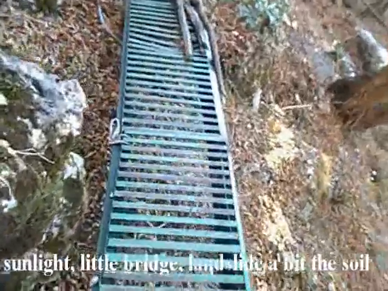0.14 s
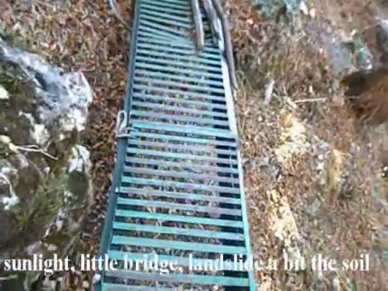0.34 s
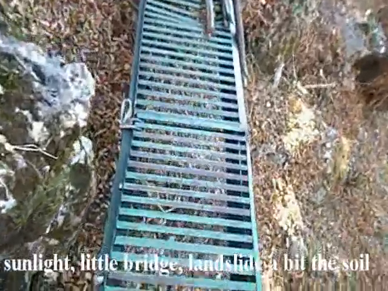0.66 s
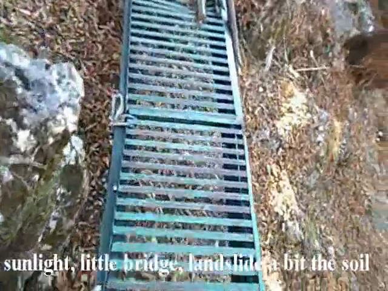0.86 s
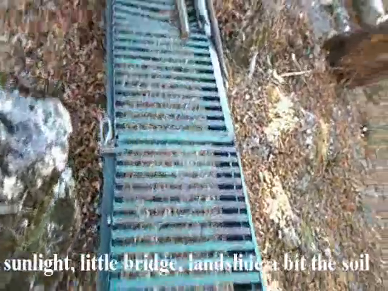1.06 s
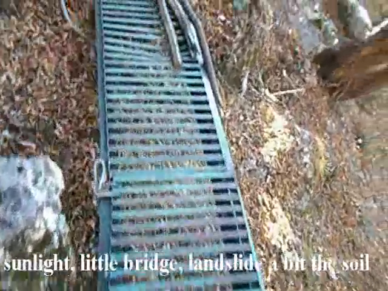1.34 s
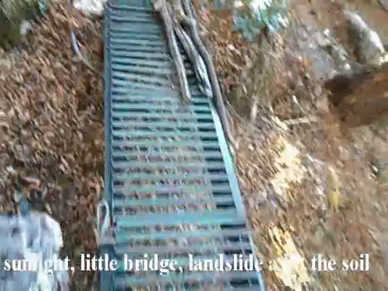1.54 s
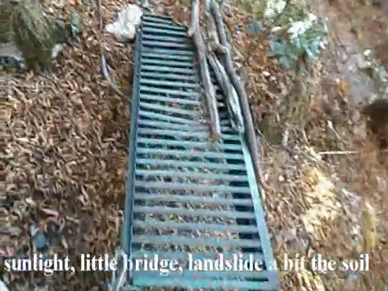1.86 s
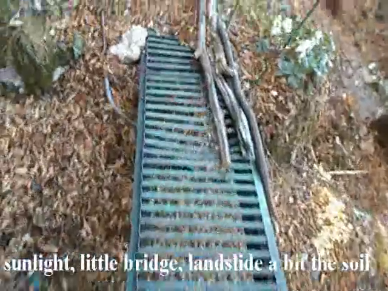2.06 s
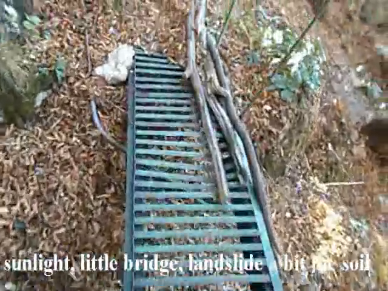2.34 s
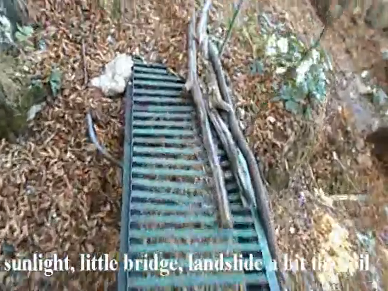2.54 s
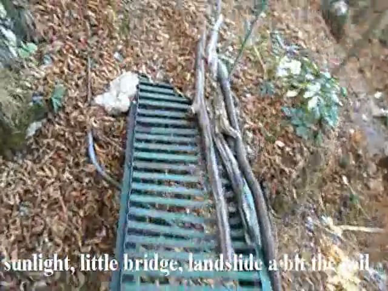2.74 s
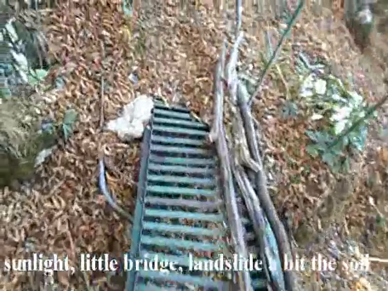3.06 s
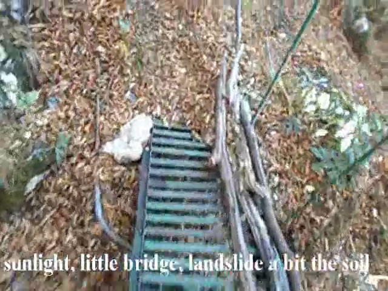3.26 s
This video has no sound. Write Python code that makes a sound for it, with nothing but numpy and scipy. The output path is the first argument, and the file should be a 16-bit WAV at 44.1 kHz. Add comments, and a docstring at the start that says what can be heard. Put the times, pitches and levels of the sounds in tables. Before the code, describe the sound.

A loose steel footbridge grating clanks, rattles and rings underfoot after quiet scuffing steps outdoors.

```python
"""A loose steel panel in a footbridge grating clanks, rattles and rings underfoot, then again at the next step.
Each clank is a noise crack with random re-touches, a dense crowd of dying bar modes and clear panel tones.
Slow walking adds scuffs (gritty noise), snaps (resonant noise) and dull knocks near the microphone (short pulses).
A quiet wood surrounds it: a soft rush of shaped noise and faint random crackles of leaves."""
import sys
import numpy as np
from scipy import signal
from scipy.fft import rfft, irfft
from scipy.io import wavfile

SR = 44100
rng = np.random.default_rng(int(sys.argv[2]) if len(sys.argv) > 2 else 0)


def inscribe(sig):
    """Save sig as 16-bit PCM at rate SR to the path in sys.argv[1].

    A 1-D sig is mono; a 2-D sig holds one channel per row.
    Samples are clipped to [-1, 1] before scaling.
    """
    pcm = np.round(np.clip(np.atleast_2d(sig).T, -1, 1) * 32767)
    wavfile.write(sys.argv[1], SR, pcm.astype(np.int16))


N = 149940
TIME_S = np.arange(N) / SR
CUTOFF_HZ = 13000


def from_db(db):
    """Decibels to amplitude gain."""
    return 10 ** (np.asarray(db) / 20)


def at_hz(points, hz):
    """Interpolate the second column of a table over log frequency."""
    table = np.array(points)
    return np.interp(np.log(hz + 1e-9), np.log(table[:, 0]), table[:, 1])


def noise(colour_db, size=N):
    """Gaussian noise of rms 1, spectrum colour_db(f), nothing from CUTOFF_HZ up."""
    hz = np.maximum(np.fft.rfftfreq(size, 1 / SR), 10)
    spectrum = rfft(rng.standard_normal(size)) * from_db(colour_db(hz))
    x = irfft(spectrum * (hz < CUTOFF_HZ), size)
    return x / x.std()


def random_phases(count):
    """Unit phasors at random angles."""
    return np.exp(2j * np.pi * rng.random(count))


def add(out, start_s, x):
    """Mix x into out from start_s, clipped to the ends."""
    i = max(int(start_s * SR), 0)
    out[i:i + len(x)] += x[:max(N - i, 0)]


# rush spectrum, relative: f/Hz, level/dB per Hz
AIR_SPECTRUM = [(25, -35), (60, 2.5), (150, 4), (300, 1), (500, -2), (900, -1), (1400, -7.5), (2000, -10.5),
                (3000, -18), (4400, -18), (6000, -24), (8000, -33), (11300, -27), (12500, -41)]
# rush level: t/s, level/dB rms
AIR_LEVEL = [(0, -49), (.35, -47), (.85, -49.5), (1.3, -48.5), (1.7, -50.5), (2.2, -48.5), (2.9, -44.5),
             (3.4, -51)]


def air():
    """Outdoor rush: smooth shaped noise with a slowly drifting level."""
    level_db = np.interp(TIME_S, *np.transpose(AIR_LEVEL))
    return noise(lambda f: at_hz(AIR_SPECTRUM, f)) * from_db(level_db)


# soles and clothing rub: t/s, level/dB, rise/s, fade time constant/s, tilt/dB per octave (700-6000 Hz)
SCUFFS = [(.01, -54, 0.0045, 0.044, 0), (0.256, -50.5, 0.011, 0.05, -1), (.33, -50.5, 0.006, 0.025, 0),
          (.406, -40.5, 0.0074, 0.074, -5), (.44, -42.5, 0.0064, 0.085, -2),
          (.512, -43.5, .012, 0.024, -0.5), (.595, -46, 0.013, 0.05, -2), (.925, -52, 0.0078, 0.077, 2.5),
          (1.251, -50.5, 0.068, 0.15, -4.5), (1.73, -53.5, 0.017, 0.088, -3),
          (1.992, -42, 0.016, 0.077, -9.5), (2.254, -38, .035, 0.022, 2), (2.82, -48.5, 0.0037, 0.028, 12),
          (3.111, -54, 0.011, 0.01, 6)]
# rub spectrum, relative: f/Hz, level/dB
SCUFF_SPECTRUM = [(200, 7), (700, 8), (1200, 6), (1800, -2), (2400, 3), (3200, -0.5), (4500, 3), (6000, -1),
                  (8000, -9.5), (12000, -6.5)]
GRIT_RMS_DB, GRIT_CORNER_HZ = 2.5, 43


def scuffs():
    """Friction: noise that swells and fades, its level roughened by slow noise."""
    out, t = np.zeros(N), TIME_S[:SR // 2]
    for start_s, level_db, rise_s, fade_s, tilt_db in SCUFFS:
        rub = noise(lambda f: at_hz(SCUFF_SPECTRUM, f) + tilt_db * np.log2(np.clip(f, 700, 6000)), len(t))
        grit = noise(lambda f: -20 * np.log10(1 + (f / GRIT_CORNER_HZ) ** 2), len(t))
        envelope = np.minimum(t / rise_s, 1) * np.exp(-np.maximum(t - rise_s, 0) / fade_s)
        add(out, start_s, rub * from_db(level_db + GRIT_RMS_DB * grit) * envelope)
    return out


# dry leaves, spectrum, relative: f/Hz, level/dB
CRACKLE_SPECTRUM = [(1500, -12), (4500, -6), (8000, -5), (11500, 4), (12500, -15)]
CRACKLES_PER_S, CRACKLE_MIN_DB, CRACKLE_MAX_DB, CRACKLE_FADE_S = 20, -68, -50, 0.003


def leaves():
    """Dry leaves and grit: one short noise snap repeated at random times and levels."""
    t = TIME_S[:SR // 30]
    snap = noise(lambda f: at_hz(CRACKLE_SPECTRUM, f), len(t)) * np.exp(-t / CRACKLE_FADE_S)
    sizes = from_db(rng.uniform(CRACKLE_MIN_DB, CRACKLE_MAX_DB, N))
    happens = rng.random(N) < CRACKLES_PER_S / SR
    return signal.fftconvolve(sizes * happens, snap)[:N]


# dull knocks near the microphone: t/s (pulse centre), envelope peak level/dB before the low cut, f/Hz
KNOCKS = [(.098, -31, 142), (0.105, -37, 190), (.133, -30, 157), (0.146, -36, 214), (0.216, -34, 253),
          (0.418, -28.5, 263), (0.472, -32, 214), (0.505, -32, 221), (.594, -31.5, 244), (0.647, -18, 145),
          (.706, -28, 173), (.755, -26, 179), (.77, -31.5, 186), (.902, -26.5, 208), (1.081, -30, 154),
          (1.44, -29.5, 194.8), (1.487, -27, 240), (1.67, -29, 161), (1.706, -27, 190), (1.747, -23.5, 142),
          (1.755, -30, 214), (1.774, -26, 193), (1.999, -23.5, 190), (2.023, -27, 252), (2.046, -30.5, 274),
          (2.073, -26, 265), (2.107, -21, 232), (2.115, -23, 238), (2.132, -24, 201), (2.259, -29, 211),
          (2.284, -14.5, 430), (2.294, -22.5, 268), (2.319, -23.5, 290), (2.631, -22, 221),
          (2.701, -15.5, 260), (2.731, -24.5, 225), (2.766, -28, 240), (2.818, -26, 273), (2.825, -21, 180),
          (2.853, -16.5, 190), (2.873, -22, 234), (2.896, -17, 187), (2.944, -18.5, 160), (2.954, -24, 195),
          (2.974, -12.5, 205), (3.005, -22.5, 173), (3.04, -22, 218), (3.075, -13, 225), (3.091, -19, 207),
          (3.107, -22, 245), (3.144, -24, 164), (3.181, -22, 222), (3.231, -21.5, 260), (3.243, -17, 240),
          (3.256, -24, 257), (3.282, -18, 219), (3.331, -25, 269)]
KNOCK_WIDTH_CYCLES, KNOCK_LOW_CUT_HZ = 0.27, 50
FAINT_KNOCKS, FAINT_KNOCK_DB, FAINT_KNOCK_HZ = 45, -38, 190  # centres: +-3 dB, +-0.5 octave


def knocks():
    """Soft pushes: random-phase cosines in a sech envelope, about one cycle, no ring; faint ones at random."""
    out, t = np.zeros(N), TIME_S[:SR // 20]
    middle_s = t.mean()
    faint = []
    for when, loud, pitch in rng.random((FAINT_KNOCKS, 3)):
        level_db = FAINT_KNOCK_DB + 6 * (loud - 0.5)
        faint.append((when * N / SR, level_db, FAINT_KNOCK_HZ * 2 ** (pitch - 0.5)))
    for centre_s, level_db, hz in list(KNOCKS) + faint:
        cycles = (t - middle_s) * hz
        wave = np.cos(2 * np.pi * (cycles + rng.random()))
        add(out, centre_s - middle_s, from_db(level_db) * wave / np.cosh(cycles / KNOCK_WIDTH_CYCLES))
    low_cut = signal.butter(2, KNOCK_LOW_CUT_HZ, "high", fs=SR, output="sos")
    return signal.sosfilt(low_cut, out)


# grit and twigs snap and tap: t/s, peak level/dB, f/Hz, fade time constant/s
TICKS = [(.473, -39, 8800, .003), (.522, -38, 2230, 0.017), (1.31, -28, 1900, 0.0024),
         (1.849, -37.5, 4450, 0.005), (2.017, -34, 740, 0.0021), (2.086, -34, 840, 0.0045),
         (2.269, -26.5, 543, 0.0044), (3.241, -34, 563, 0.0078), (3.315, -39, 4800, 0.0021)]
TICK_HALF_WIDTH_OCTAVES = 0.22  # at -6 dB


def ticks():
    """Tiny snaps: decaying noise through one broad resonance."""
    out, t = np.zeros(N), TIME_S[:SR // 10]
    for start_s, peak_db, tick_hz, fade_s in TICKS:
        def resonance_db(f):
            return -20 * np.log10(1 + (np.log2(f / tick_hz) / TICK_HALF_WIDTH_OCTAVES) ** 2)
        snap = noise(resonance_db, len(t)) * np.exp(-t / fade_s)
        add(out, start_s, from_db(peak_db) * snap / abs(snap).max())
    return out


BASS_BELOW_HZ, TREBLE_ABOVE_HZ = 1300, 3530


def contact_db(hz, bass_db, treble_db):
    """Contact force spectrum: bass and treble shelves."""
    bass = bass_db / (1 + (hz / BASS_BELOW_HZ) ** 4)
    return bass + treble_db / (1 + (TREBLE_ABOVE_HZ / hz) ** 4)


# bar response, relative, shared by crack and modes: f/Hz, level/dB
BARS = [(250, -0.5), (480, -4), (750, 5.5), (1200, 1.5), (1600, -3), (2300, -1.5), (2750, -1.5), (3350, 4),
        (3900, -1), (4400, 3), (4900, -0.5), (5700, 2), (6300, -2.5), (7500, -13), (12500, -12)]
CRACK_FADE_S = 0.0044
RATTLE_PER_S, RATTLE_DB, RATTLE_FADE_S = 130, -12, 0.045


def crack(bass_db, treble_db):
    """Sharp contact: a noise burst, repeated more weakly as the panel rattles to rest."""
    t, short = TIME_S[:SR // 5], TIME_S[:SR // 20]
    burst = noise(lambda f: at_hz(BARS, f) + contact_db(f, bass_db, treble_db), len(short))
    burst = burst * np.exp(-short / CRACK_FADE_S)
    happens = rng.random(len(t)) < RATTLE_PER_S / SR
    touches = happens * rng.uniform(-1, 1, len(t)) * from_db(RATTLE_DB) * np.exp(-t / RATTLE_FADE_S)
    return signal.fftconvolve(touches + (t == 0), burst)


def ringing(hz, t60_s, strength):
    """One second of summed dying sines; complex strength sets level and phase."""
    pole = 2j * np.pi * hz - np.log(1000) / t60_s
    size = int(np.sqrt(SR))  # SR = size**2: block starts times samples within a block
    starts = np.exp(np.outer(TIME_S[:SR:size], pole))
    within = np.exp(np.outer(pole, TIME_S[:size]))
    return ((starts * strength) @ within).imag.ravel()[:SR]


# bar mode decay: f/Hz, t60/s
BARS_T60 = [(300, 1), (1000, 0.64), (2800, 0.55), (5000, 0.33), (7500, 0.38), (12000, 0.2)]


def bar_modes(hz, response_db, bass_db, treble_db):
    """Dense crowd of bar modes in random phase, unit power at onset."""
    strength = from_db(response_db + contact_db(hz, bass_db, treble_db)) * random_phases(len(hz))
    power = np.sum(abs(strength) ** 2) / 2
    return ringing(hz, at_hz(BARS_T60, hz), strength / np.sqrt(power))


# clear panel tones, keyed by the place that excites them most: f/Hz, level/dB, t60/s
PANEL = {"edge": [(661, -6, .5), (735, -6, .5), (902, -4, .45), (1361, 0, .4), (2046, -3, .45),
         (2299, 1, .33), (2389, -1, .35), (3677, 0, .3)], "middle": [(711, -10, .7), (840, -11, .75),
         (1110, -10, .4), (1419, -9, .8), (1875, -10, .5), (2010, -6, .4), (2528, -4, .3), (2963, 4, .25),
         (3011, -5, .3), (3067, -10, .6), (3287, -5, .38), (3321, -14, .9), (3336, -10, .6),
         (3375, -12, .55), (3514, -2, .28), (4120, -3, .27), (5109, -6, .25), (5347, -4, .25),
         (5585, -4, .25)], "corner": [(1010, -3, .25), (3300, -17, .6), (3492, -3, .25), (3561, -3, .25),
         (4400, 3, .25), (4650, -3, .22), (5136, -1, .2), (5881, 2, .27)]}
ELSEWHERE_DB = -14


def panel_tones(place, tones_db):
    """Clear panel modes: full level for tones of the struck place, weaker for the rest."""
    hz, level_db, t60_s = np.vstack(list(PANEL.values())).T
    home = np.array([name for name in PANEL for _ in PANEL[name]])
    level_db = tones_db + level_db + ELSEWHERE_DB * (home != place)
    return ringing(hz, t60_s, from_db(level_db) * random_phases(len(hz)))


# loose panel hits its frame: t/s, bar ring level/dB, crack level/dB, bass/dB, treble/dB, clear tones level/dB,
# foot damping of the bar ring/dB per s (sign ignored), place struck
CLANKS = [(2.2809, -29, -27.5, -8, -11, -43, 72, "edge"), (2.368, -20.5, -10, -12, -5, -32.5, -5, "edge"),
          (2.418, -27.5, -46, -4.5, -6, -32, -3, "edge"), (2.468, -20, -9.5, -9.5, -8, -24.5, 3, "middle"),
          (2.4788, -24.5, -23, -6.5, -0.5, -37, 57, "middle"),
          (2.512, -19.5, -12.5, -13, -5.5, -26, 11, "middle"),
          (2.546, -25, -36, -2, -20, -39, 25, "middle"), (2.583, -32, -40, 7, -12, -50, 50, "middle"),
          (2.8581, -16, -23, 0, 9.5, -30, 142, "corner"), (2.95, -37, -25.5, -12, 16, -53, 211, "corner")]
BAR_MODES, MODE_SPREAD_DB = 520, 2.8


def grating():
    """Clanks: crack, bar crowd damped by the foot, and panel tones; mode frequencies stay the same."""
    out, t = np.zeros(N), TIME_S[:SR]
    hz = np.linspace(BARS[0][0], BARS[-1][0], BAR_MODES)
    hz = hz + (hz[1] - hz[0]) * rng.uniform(-1.01, 1, BAR_MODES)
    response_db = at_hz(BARS, hz) + MODE_SPREAD_DB * rng.standard_normal(BAR_MODES)
    for start_s, ring_db, crack_db, bass_db, treble_db, tones_db, damping_db_per_s, place in CLANKS:
        crowd = bar_modes(hz, response_db, bass_db, treble_db)
        damped = crowd * from_db(ring_db - abs(damping_db_per_s) * t)
        add(out, start_s, damped + panel_tones(place, tones_db))
        add(out, start_s, from_db(crack_db) * crack(bass_db, treble_db))
    return out


def scene():
    """Sum of all sources, one channel, no reverberation."""
    return (air() + scuffs() + leaves() + knocks() + ticks() + grating())[None]


# treble notches: f/Hz, width/Hz
DIPS = [(7000, 890), (8500, 1220), (10000, 1220), (12150, 2000)]
LOW_BAND_TO_HZ, HIGH_BAND_FROM_HZ, HIGH_BAND_DB = 6440, 7000, 1.5
TOP_ROLLOFF_HZ = 11500


def record(dry):
    """Small microphone: split bands, notched uneven treble, tanh-rounded peaks, top cut."""
    low_band = signal.butter(12, LOW_BAND_TO_HZ, fs=SR, output="sos")
    high_band = signal.butter(12, HIGH_BAND_FROM_HZ, "high", fs=SR, output="sos")
    x = signal.sosfilt(low_band, dry) + from_db(HIGH_BAND_DB) * signal.sosfilt(high_band, dry)
    for hz, width_hz in DIPS:
        x = signal.lfilter(*signal.iirnotch(hz, hz / width_hz, fs=SR), x)
    rounded = np.tanh(x)
    x = signal.sosfilt(signal.butter(10, TOP_ROLLOFF_HZ, fs=SR, output="sos"), rounded)
    return signal.sosfilt(signal.ellip(10, 0.3, 80, CUTOFF_HZ, fs=SR, output="sos"), x)


dry = scene()
out = record(dry)
inscribe(out)
```